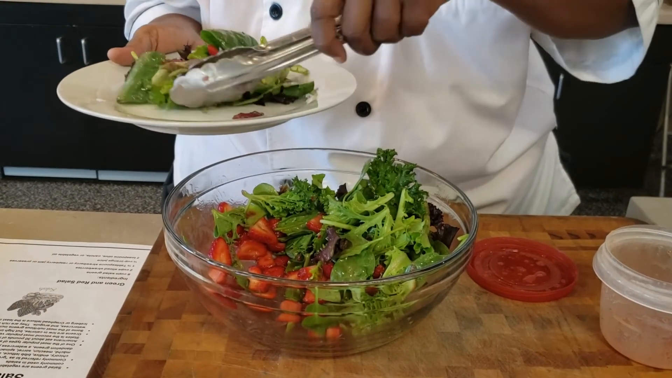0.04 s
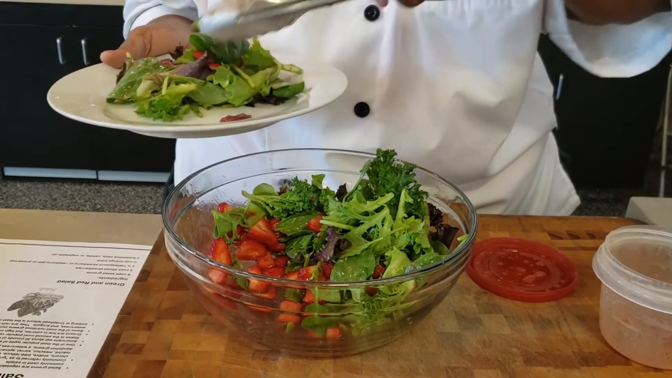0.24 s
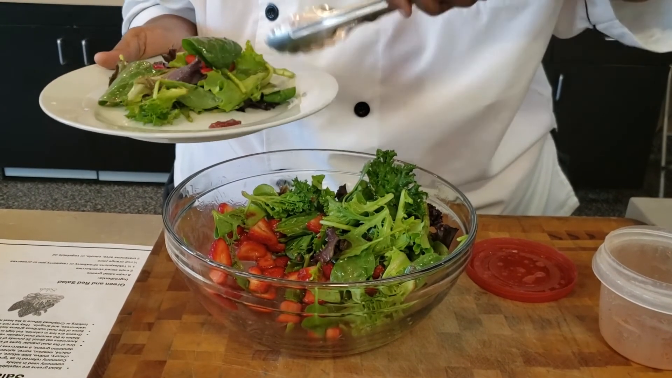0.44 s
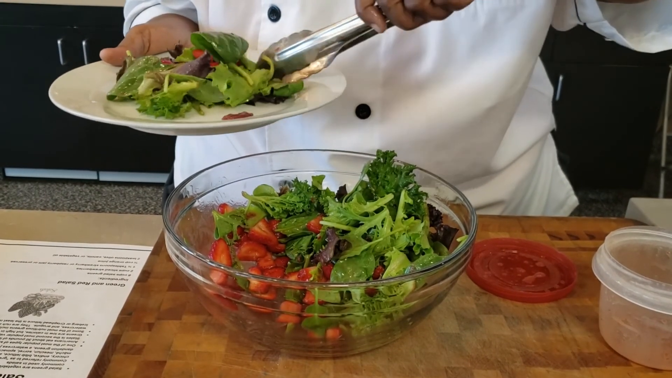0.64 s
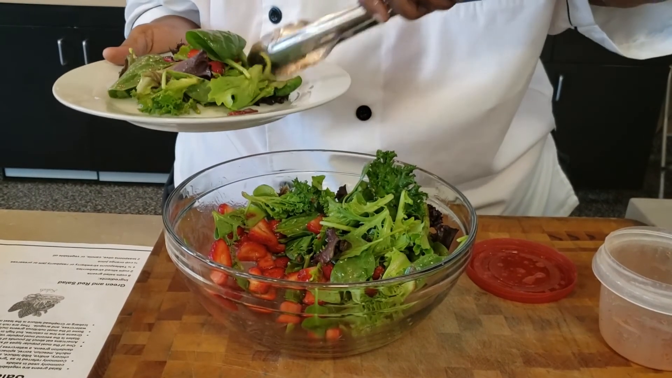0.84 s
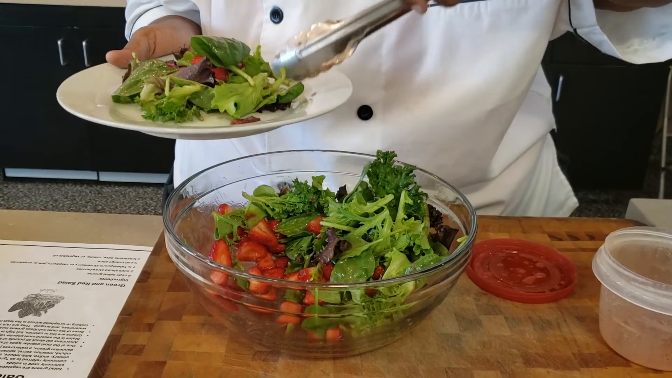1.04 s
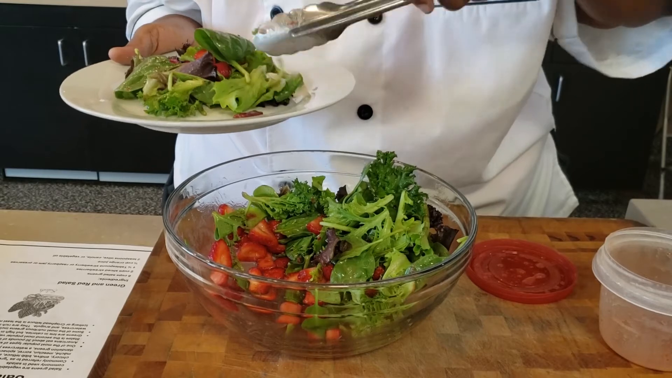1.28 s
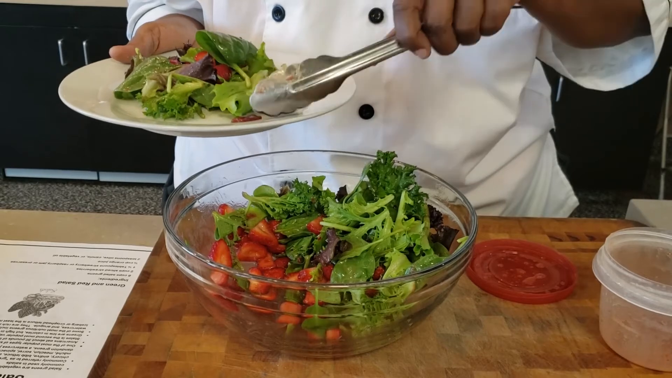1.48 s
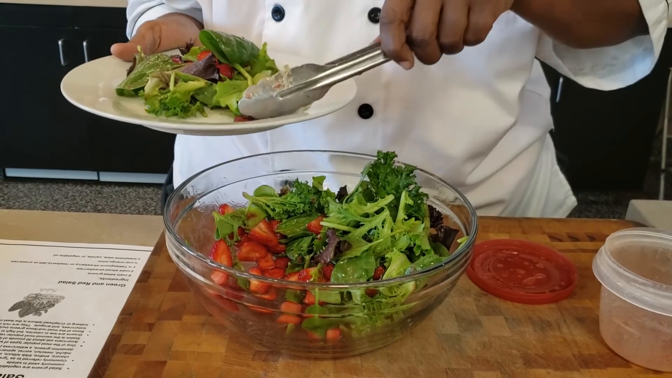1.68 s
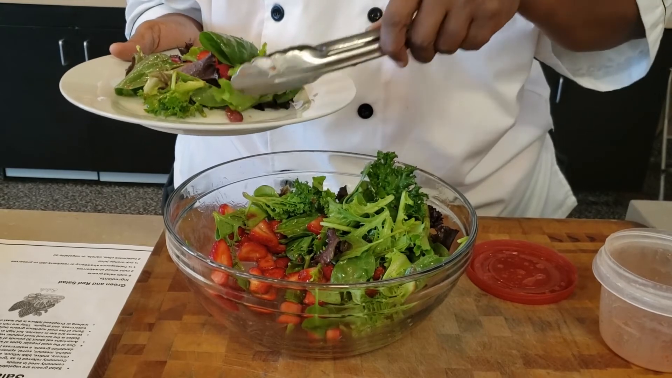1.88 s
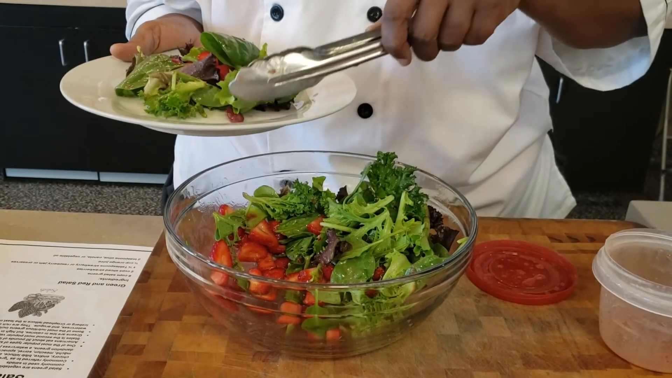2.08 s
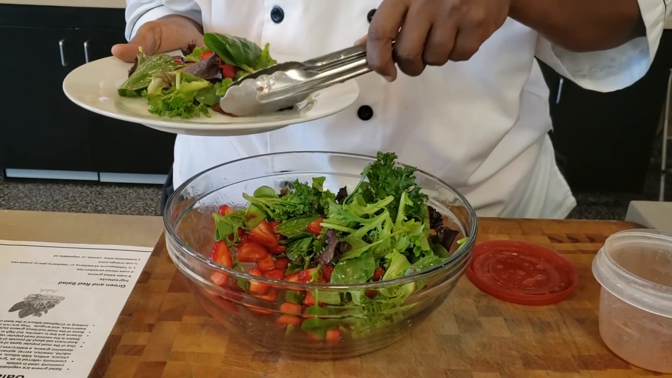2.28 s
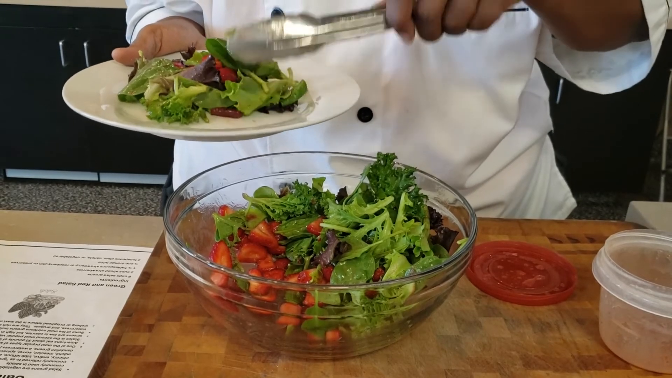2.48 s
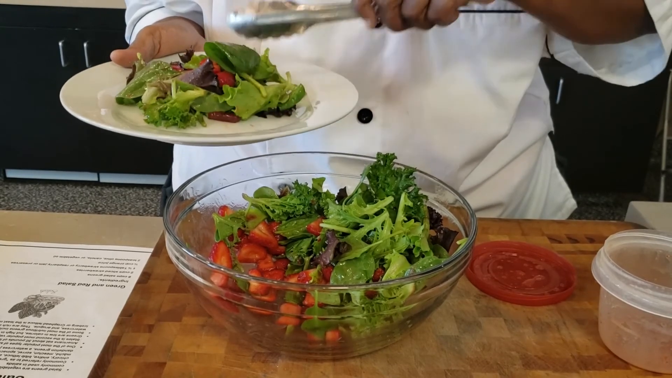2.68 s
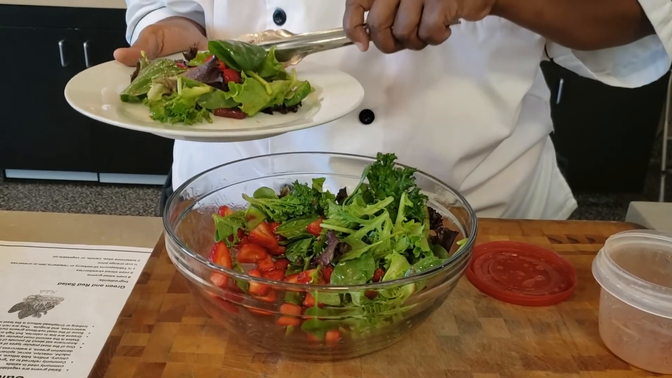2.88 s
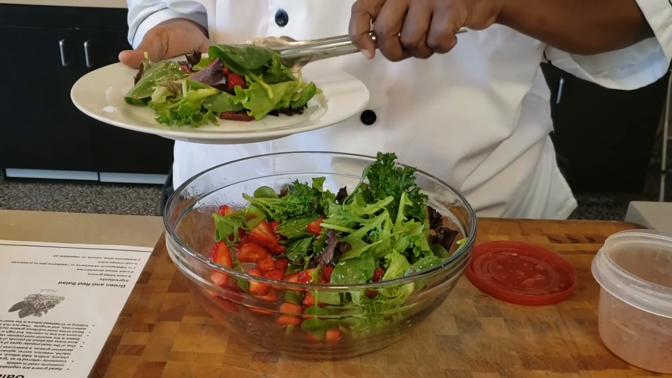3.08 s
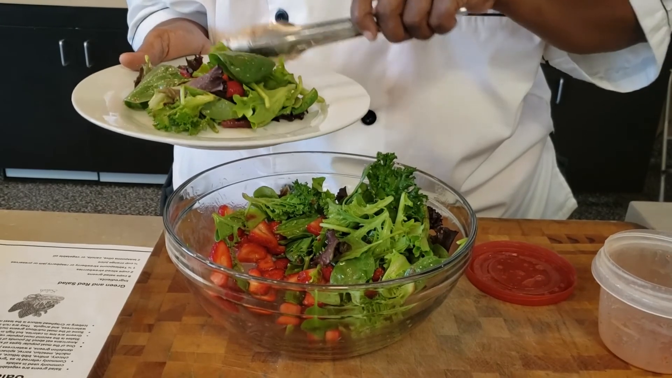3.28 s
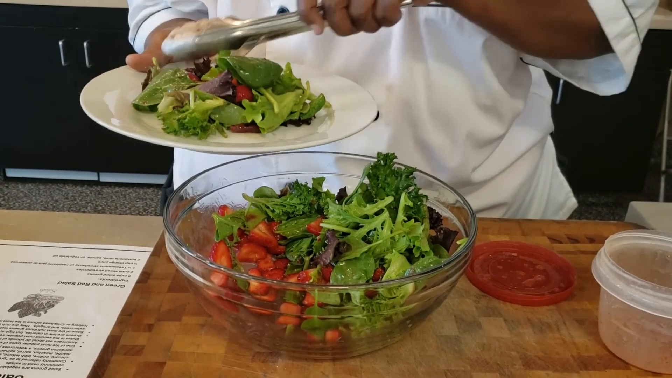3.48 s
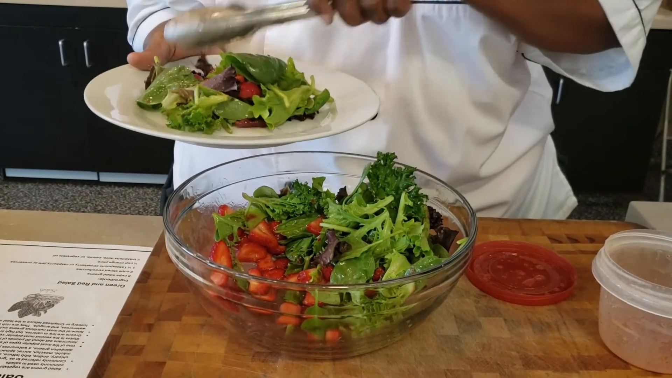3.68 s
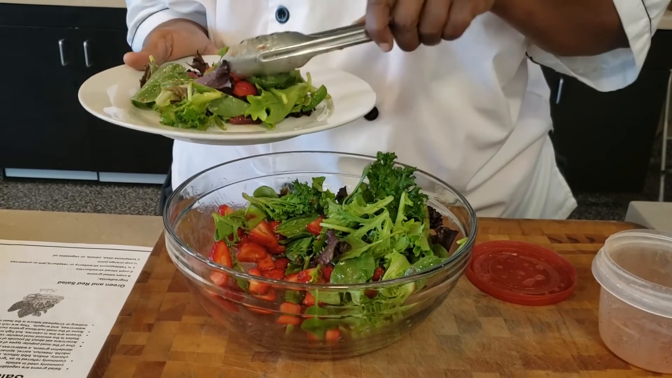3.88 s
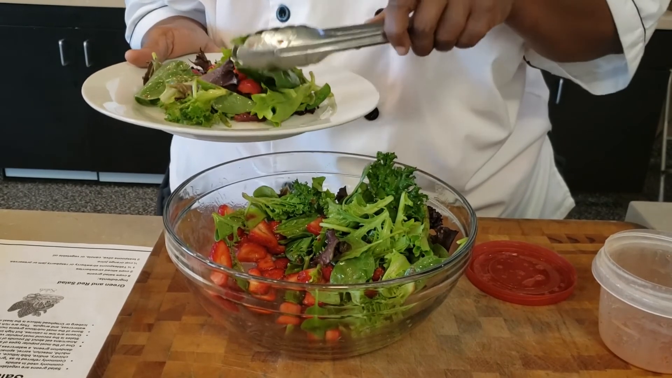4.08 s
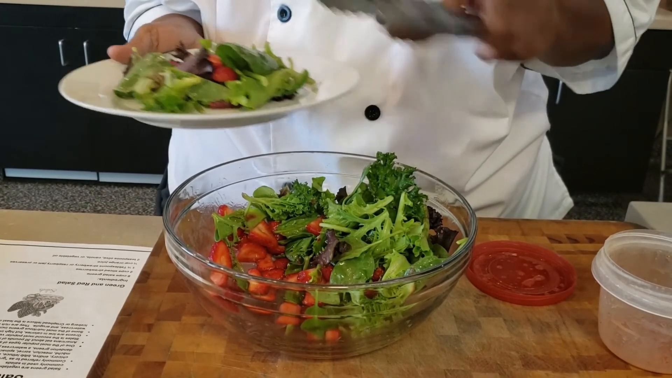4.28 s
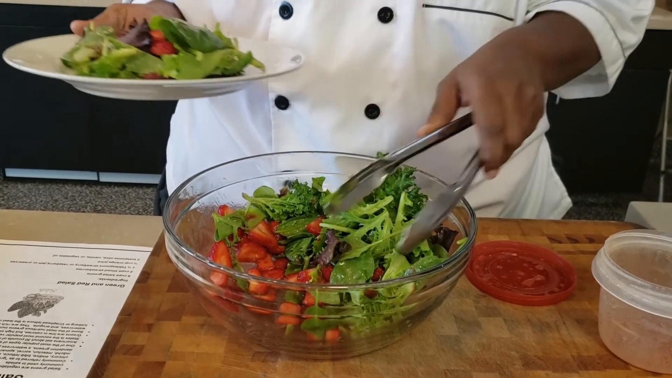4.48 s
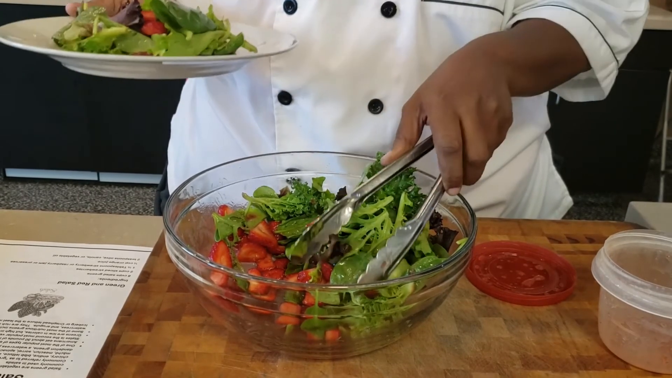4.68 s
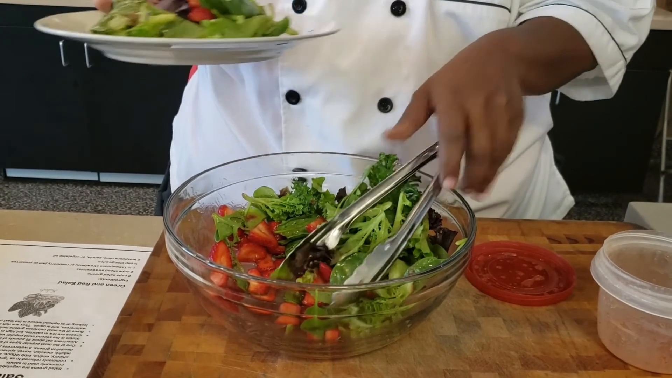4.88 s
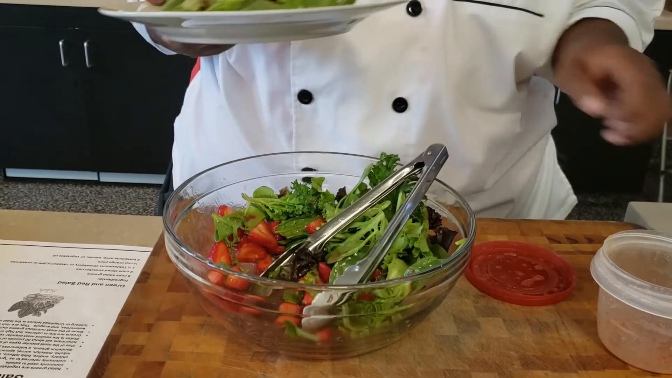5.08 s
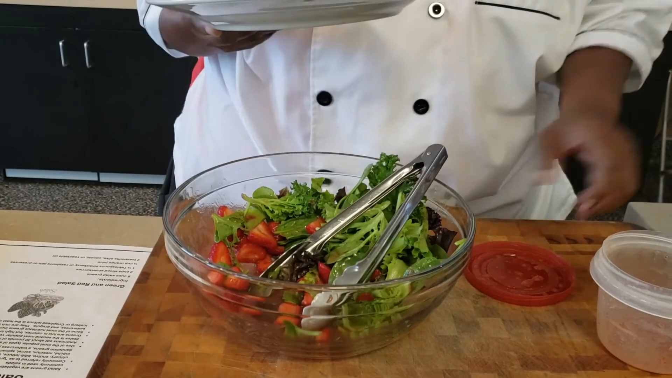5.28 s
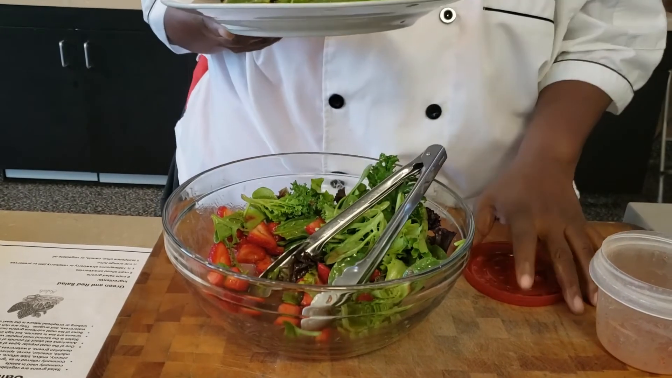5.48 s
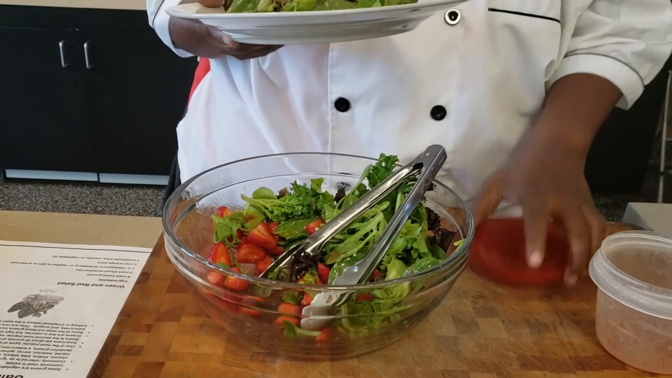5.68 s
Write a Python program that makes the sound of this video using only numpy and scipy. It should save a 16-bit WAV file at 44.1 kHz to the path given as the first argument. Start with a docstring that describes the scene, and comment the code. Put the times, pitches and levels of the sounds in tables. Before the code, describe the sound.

Sparse metallic tong clinks over low ventilation rumble, then a loud, bright clatter of steel on glass, settling before soft plastic taps.

```python
"""A quiet kitchen carries a low rumble, a steady machine hum and faint hiss: filtered noise and one sine.
Salad leaves rustle faintly as crowds of tiny clicks; steel tongs clink by the plate, then snap shut.
The tongs graze a glass bowl and drop in, where they ring, rattle, skid and settle; the leaves shift again.
Last, a hand taps a plastic lid on the board. Each blow sums decaying modes and a noisy crack.
Room echoes surround the handling sounds, and a gain control ducks the loud blows."""
import sys
import numpy as np
from scipy import signal
from scipy.fft import rfft, irfft, next_fast_len
from scipy.io import wavfile
from scipy.ndimage import uniform_filter1d

SR = 44100
rng = np.random.default_rng(int(sys.argv[2]) if len(sys.argv) > 2 else 0)


def dump(signal):
    """Clip the signal to [-1, 1] and save it as 16-bit WAV at the path in sys.argv[1]."""
    limited = np.clip(np.atleast_2d(signal).T, -1, 1)
    pcm = np.round(limited * 32767).astype(np.int16)
    wavfile.write(sys.argv[1], SR, pcm)


N = 253045
TIME = np.arange(N) / SR
RING_TIME = TIME[:SR // 4]


def from_db(db):
    """Logarithmic level: decibels become an amplitude gain."""
    return 10 ** (np.asarray(db) / 20)


def rms_one(x):
    """Normalisation of power: scale to rms 1."""
    return x / np.sqrt(np.mean(x ** 2) + 1e-20)


def attack_one(x):
    """Normalisation of the onset: the first hundredth of a second gets rms 1."""
    return x / np.sqrt(np.mean(x[:, :SR // 100] ** 2))


def decay(t, t60):
    """Exponential damping: the amplitude falls 60 dB in t60 seconds."""
    return np.exp(-np.log(1000) * t / t60)


def at_hz(points, hz):
    """Interpolation of a table along a logarithmic frequency axis."""
    known_hz, values = np.transpose(points)
    return np.interp(np.log(np.maximum(hz, 1)), np.log(known_hz), values)


def colour(x, spectrum):
    """Minimum-phase filtering to a (Hz, dB) shape: causality lets nothing sound early."""
    size = 2 * next_fast_len(x.shape[-1] // 2 + 2048)
    log_gain = np.log(from_db(at_hz(spectrum, np.fft.rfftfreq(size, 1 / SR))))
    cepstrum = irfft(log_gain)
    # Folding the cepstrum onto positive times gives minimum phase.
    cepstrum[1:size // 2] *= 2
    cepstrum[size // 2 + 1:] = 0
    response = np.exp(rfft(cepstrum))
    return irfft(rfft(x, size) * response)[..., :x.shape[-1]]


def add(track, s, sound):
    """Superposition: mix a stereo sound in at a time in seconds."""
    start = round(s * SR)
    track[:, start:start + sound.shape[1]] += sound[:, :N - start]


# Likeness of the two channels of the room noise. Each row: frequency in Hz, left-right correlation.
LIKENESS = [(30, 0.93), (60, 1), (125, 0.97), (250, 0.86), (500, 0.56), (1500, 0.053), (8000, 0.6)]


def steady_noise(spectrum):
    """Diffuse field: left-right correlation varies with frequency, highest in the bass."""
    mid, side = rfft(rng.standard_normal((2, next_fast_len(N, True))))
    alike = np.clip(at_hz(LIKENESS, np.linspace(0, SR / 2, len(mid))), 0, 1)
    mid = np.sqrt(1 + alike) * mid
    side = np.sqrt(1 - alike) * side
    pair = irfft(mid + side * [[1], [-1]])[:, :N]
    return rms_one(colour(pair, spectrum))


# Spectra of the ventilation rumble and the hiss. Each row: frequency in Hz, relative density in dB per Hz.
RUMBLE = [(22, -30.5), (38, -5.5), (59, -1.5), (81, -2.5), (113, -0.5), (242, -12.5), (264, -14),
          (319, -16), (355, -13), (400, -20), (520, -50.5), (880, -120)]
AIR = [(240, -34), (400, -3.5), (1040, -19), (1250, -19.5), (1490, -23.5), (2120, -26), (2750, -29.5),
       (3420, -30.5), (4050, -35), (7510, -29), (9320, -38.5), (11200, -35), (16000, -42)]
RUMBLE_DB, AIR_DB, HUM_DB = -45.5, -59, -49   # rms levels
HUM_HZ = 58.86


def background():
    """Stationary sources: ventilation rumble and hiss are shaped noise, a motor's hum is a pure tone."""
    rumble = from_db(RUMBLE_DB) * steady_noise(RUMBLE)
    hiss = from_db(AIR_DB) * steady_noise(AIR)
    hum = from_db(HUM_DB) * np.sqrt(2) * np.sin(2 * np.pi * HUM_HZ * TIME)
    return rumble + hiss + hum


def grains(per_s, uneven_db):
    """Random impulse process: sparse clicks of uneven size and either sign."""
    size_db = uneven_db * (2 * rng.random(N) - 1)
    clicks = rng.random(N) < per_s / SR
    return clicks * rng.choice([-1, 1], N) * from_db(size_db)


def strokes(events, attack_s, release_db_per_s):
    """Contact pressure as envelope: each stroke builds up to its start, holds, then dies away."""
    total = np.zeros(N)
    for s, length_s, db in events:
        rise = np.clip(1 + (TIME - s) / attack_s, 0, 1)
        fall_db = release_db_per_s * np.maximum(TIME - s - length_s, 0)
        total += from_db(db - fall_db) * rise
    return total


# Leaves shift under the tongs, then settle. Each row: start of full pressure in seconds,
# length in seconds, level in dB.
RUSTLES = [(.035, 0.016, -56), (4.77, .05, -67), (5.3, 0.36, -63)]
RUSTLE_ATTACK_S, RUSTLE_RELEASE_DB_PER_S = 0.083, 77


def leaves():
    """Crackling noise: a dense crowd of tiny crisp impulses makes the rustle of salad leaves."""
    crackle = np.array([grains(per_s=1300, uneven_db=12) for side in range(2)])
    crisp = colour(crackle, [(300, 0), (1700, 1.5), (4000, -1.5), (8000, -5.5), (15000, -7.5)])
    return rms_one(crisp) * strokes(RUSTLES, RUSTLE_ATTACK_S, RUSTLE_RELEASE_DB_PER_S)


# Phase between the microphones at full spread. Each row: frequency in Hz, phase in radians.
MIC_PHASE = [(500, .3), (1700, .5), (2600, 1.0), (3700, 2.3), (6000, 2.3), (8000, .7), (14000, .4)]
FOCUS_DB, FOCUS_OCTAVES = 7.5, 0.12   # lift of the modes a point of contact favours, and its width


def ringing(modes, focus_hz, spread, split=0.007):
    """Modal synthesis: modes in close pairs beat; the point of contact favours those near one pitch."""
    hz, db, t60 = np.transpose(modes)[:, :, None]
    favour_db = FOCUS_DB * np.exp(-(np.log2(hz / focus_hz) / FOCUS_OCTAVES) ** 2)
    height = from_db(db + favour_db) * decay(RING_TIME, t60)
    phase = rng.uniform(0, 2 * np.pi, hz.shape)
    turn = 2 * np.pi * hz * RING_TIME
    twin = turn * (1 + split * rng.choice([-1, 1], hz.shape))
    # The side is in quadrature with the mid, so mixing them shifts the phase of each channel.
    mid = height * (np.sin(turn + phase) + .5 * np.sin(twin + phase))
    side = height * (np.cos(turn + phase) + .5 * np.cos(twin + phase))
    apart = spread * at_hz(MIC_PHASE, hz) / 2
    common = (mid * np.cos(apart)).sum(0)
    opposed = (side * np.sin(apart)).sum(0)
    return attack_one(common + opposed * [[-1], [1]])


def crack(spectrum, t60, width):
    """High modal density: the weak, short modes of a contact merge into decaying noise."""
    mid, side = rng.standard_normal((2, len(RING_TIME)))
    burst = (mid + width * side * [[1], [-1]]) * decay(RING_TIME, t60)
    return attack_one(colour(burst, spectrum))


CONTACT_S = .001   # time constant of the onset


def blows(events, modes, crack_spectrum, crack_t60, spread, width):
    """Impact excitation: each blow is ring plus crack, with its own brightness."""
    out = np.zeros((2, N))
    for s, db, bright_db, crack_db, pan_db, focus_hz in events:
        ring = ringing(modes, focus_hz, spread)
        blow = ring + from_db(crack_db) * crack(crack_spectrum, crack_t60, width)
        blow = blow * (1 - np.exp(-RING_TIME / CONTACT_S))
        blow = colour(blow, [(500, 0), (16000, 5 * bright_db)])   # a tilt over five octaves
        side_gains = from_db([[db + pan_db / 2], [db - pan_db / 2]])
        add(out, s, attack_one(blow) * side_gains)
    return out


# Clinks of the open tongs. Each row: start in seconds, level in dB, brightness in dB per octave,
# crack against ring in dB, left against right in dB, pitch favoured by the point of contact in Hz.
CLINKS = [(.5528, -23, .5, 1, 1.5, 1464), (.7115, -33.5, 0.5, 0, 2.5, 2740),
          (1.5022, -38.5, 4.5, -13, 2.5, 4730), (1.5212, -21.5, 0.5, -4, 2, 1830),
          (1.687, -37.5, -1, -5, 3, 1720), (1.7512, -35, -1.5, 5, 1.5, 4160), (4.2625, -55, 8, -4, 4, 4700)]
# Modes of the open tongs. Each row: frequency in Hz, relative level in dB, t60 in seconds.
TONGS = [(608, -15.6, 0.066), (1384, -13.3, 0.123), (1718, -8.6, 0.126), (2072, -10.8, 0.121),
         (2130, -9.0, 0.12), (2235, -14.4, 0.118), (2760, -7.6, 0.112), (2998, -2.8, 0.11),
         (3912, -8.1, 0.103), (3989, -5.6, 0.102), (4563, -11.8, 0.099), (4760, -5.0, 0.098),
         (5037, 0.0, 0.097), (5640, -6.6, 0.094), (5945, -10.7, 0.093), (6225, -9.4, 0.092),
         (6410, -11.2, 0.091), (6524, -12.4, 0.091), (6659, -9.6, 0.09), (7000, -15.3, 0.089),
         (7345, -15.7, 0.088), (7498, -12.6, 0.087), (7971, -15.1, 0.086), (8467, -16.1, 0.085),
         (8977, -12.2, 0.084), (11002, -17.5, 0.079), (12376, -18.0, 0.077), (12662, -22.3, 0.077),
         (13801, -21.0, 0.075), (14085, -18.6, 0.075)]
# Crack of steel. Each row: frequency in Hz, relative density in dB per Hz.
STEEL_CRACK = [(150, -93), (400, -12), (620, -4.5), (950, -9.5), (1400, -5.5), (2200, -3.5), (3400, -3.5),
               (6000, -3), (9000, -9), (15000, -12)]
# Decay of the crack by struck object: t60 in seconds.
CRACK_T60 = {"tongs": .055, "jaws": .03, "bowl": .045, "lid": .03}


def tongs_clink():
    """Free vibration: the open steel arms ring in many lightly damped modes."""
    return blows(CLINKS, TONGS, STEEL_CRACK, CRACK_T60["tongs"], spread=0.73, width=0.49)


# The jaws snap shut. Each row: start in seconds, level in dB, brightness in dB per octave,
# crack against ring in dB, left against right in dB, favoured pitch in Hz.
SNAPS = [(2.8146, -24, 0.4, -2, 2.5, 4030)]
# Modes of the shut jaws. Each row: frequency in Hz, relative level in dB, t60 in seconds.
SHUT_JAWS = [(666, -4.6, 0.026), (1255, -4.5, 0.042), (1352, -4.4, 0.044), (1718, -6.2, 0.046),
             (1827, -3.9, 0.045), (1909, -5.5, 0.045), (2133, -10.2, 0.044), (3114, -7.4, 0.04),
             (4166, -8.4, 0.037), (4484, -3.5, 0.036), (4561, 0.0, 0.036), (4796, 0.0, 0.036),
             (5021, -12.7, 0.035), (5758, -7.0, 0.034), (6367, -10.5, 0.033), (6477, -5.0, 0.033),
             (6687, -5.3, 0.033), (6797, -5.1, 0.033), (7975, -3.4, 0.031), (9972, -10.7, 0.03),
             (11679, -5.7, 0.028), (11879, -10.2, 0.028), (12082, -6.4, 0.028), (12421, -1.8, 0.028),
             (12728, -10.0, 0.028), (13993, -9.2, 0.027)]


def jaws_snap():
    """Contact damping: the shut jaws have shorter modes than the open arms."""
    return blows(SNAPS, SHUT_JAWS, STEEL_CRACK, CRACK_T60["jaws"], spread=0.52, width=0.33)


# The tongs slide on the glass: a graze going in, the skid after the drop, a last slip.
# Each row: start of full pressure in seconds, length in seconds, contact level in dB.
SLIDES = [(4.615, 0.21, -70.5), (4.89, 0.12, -36.5), (5.06, 0.069, -60)]
SLIDE_ATTACK_S, SLIDE_RELEASE_DB_PER_S = 0.019, 700
# Modes of the glass bowl. Each row: frequency in Hz, relative level in dB, t60 in seconds.
BOWL = [(468, -14.3, 0.084), (514, -16.4, 0.091), (608, -12.9, 0.103), (658, -19.5, 0.109),
        (971, -10.3, 0.146), (1071, -16.8, 0.157), (1709, 0.0, 0.196), (1841, -13.6, 0.192),
        (1919, -19.0, 0.19), (2016, -12.5, 0.188), (2344, -21.3, 0.181), (2635, -3.8, 0.176),
        (2729, -19.9, 0.174), (3691, -4.1, 0.161), (3888, -23.2, 0.159), (4198, -23.0, 0.156),
        (4744, -6.1, 0.152), (4830, -5.6, 0.151), (4951, -19.0, 0.15), (5566, -12.4, 0.146),
        (6069, -4.8, 0.143), (6173, -21.1, 0.142), (6691, -18.0, 0.139), (6901, -15.0, 0.138),
        (7165, -20.4, 0.137), (7477, -15.1, 0.135), (8926, -19.4, 0.129), (9749, -29.8, 0.127),
        (10532, -24.1, 0.124), (12261, -25.4, 0.12)]
# Crack of glass. Each row: frequency in Hz, relative density in dB per Hz.
GLASS_CRACK = [(150, -15.5), (300, -2.5), (480, 3.5), (750, -1.5), (1100, 0), (2000, 0), (3200, -6),
               (6500, -7), (9000, -12.5), (15000, -19.5)]


def skid(per_s=180, crack_db=0.0):
    """Stick-slip friction: steel on glass makes a run of small contacts that excite the bowl's modes."""
    slips = grains(per_s, uneven_db=4)
    pressure = strokes(SLIDES, SLIDE_ATTACK_S, SLIDE_RELEASE_DB_PER_S)
    ring = ringing(BOWL, focus_hz=3780, spread=0.93)
    touch = ring + from_db(crack_db) * crack(GLASS_CRACK, t60=0.022, width=0.62)
    return signal.fftconvolve([slips * pressure], touch, axes=1)[:, :N]


# Steel meets the glass bowl. Each row: start in seconds, level in dB, brightness in dB per octave,
# crack against ring in dB, left against right in dB, favoured pitch in Hz.
KNOCKS = [(4.7812, -31.5, -3.5, -10, 0, 2620), (4.844, -32.5, -1.5, -16, 1, 2800),
          (4.859, -10.5, -0.24, -8, 1, 2120), (4.8815, -17.5, 2, -12, -3, 6450),
          (4.922, -22.5, 4, -31, 8, 2635), (4.976, -22, -0.5, -7.5, 4, 1850),
          (5.009, -25, 2.5, 5.5, 2.5, 5600), (5.028, -36, -5, 17, 6, 2600),
          (5.124, -37.5, -1.5, 14, 0, 1710)]


def bowl_knocks():
    """Shell vibration: each knock of the steel sets off the modes of the glass."""
    return blows(KNOCKS, BOWL, GLASS_CRACK, CRACK_T60["bowl"], spread=1.0, width=0.51)


# Fingers on the plastic lid. Each row: start in seconds, level in dB, brightness in dB per octave,
# crack against ring in dB, left against right in dB, favoured pitch in Hz.
TAPS = [(5.528, -49, -5.5, 4, 1, 1550), (5.609, -61, -13.5, 18, -4, 3140),
        (5.654, -43.5, 2, -10.5, 3.5, 1810)]
# Modes of the lid. Each row: frequency in Hz, relative level in dB, t60 in seconds.
LID = [(1200, -7.5, 0.016), (1490, -0.5, 0.013), (1837, -6.5, 0.022), (3100, -8, 0.0081)]
# Crack of the lid. Each row: frequency in Hz, relative density in dB per Hz.
LID_CRACK = [(200, -13.5), (800, 1.5), (1700, -1.5), (3000, -2), (7000, -7.5), (10000, -27), (15000, -24)]


def lid_taps():
    """Strong damping: plastic has few modes, and they die within hundredths of a second."""
    return blows(TAPS, LID, LID_CRACK, CRACK_T60["lid"], spread=1.0, width=0.78)


def evened(response):
    """Spectral flattening: level out the broad peaks and dips of a one-second room response."""
    power = uniform_filter1d(np.abs(rfft(response)) ** 2, size=25)   # bins are 1 Hz apart
    correction_db = -10 * np.log10(power + 1e-6)
    return colour(response, np.c_[np.arange(len(power)), correction_db][1:])


# Reverberation time of the late tail. Each row: frequency in Hz, t60 in seconds.
ROOM_T60 = [(150, 0.35), (500, 0.87), (1500, 0.75), (4500, 0.95), (8000, 0.69), (15000, 0.52)]
# Echoes against direct sound, before evening. Each row: frequency in Hz, level in dB.
ROOM_DB = [(150, -4.5), (500, 0.5), (1500, 0.5), (4500, 1), (8000, -1.5), (15000, -1)]
# Stereo width of the echoes. Each row: frequency in Hz, ratio of side to mid.
ROOM_WIDTH = [(150, .2), (600, 0.14), (1700, 1), (4000, 0.81), (12000, 0.12)]


def kitchen(x, early_db=11.0, early_t60=0.12, first_echo_s=0.0029):
    """Reverberation: direct sound, dense early echoes that die fast, a late tail with t60 set by band."""
    t = TIME[:SR]
    mid, side = rfft(rng.standard_normal((2, SR)))
    bins_hz = np.arange(len(mid))
    width = at_hz(ROOM_WIDTH, bins_hz)
    white = (mid + width * side * [[1], [-1]]) / np.hypot(1, width)
    centres = np.geomspace(125, 16000, 8)
    response = signal.unit_impulse(SR)
    for hz, share in zip(centres, np.eye(len(centres))):
        band = irfft(white * at_hz(np.c_[centres, share], bins_hz), SR)
        late = decay(t, at_hz(ROOM_T60, hz))
        early = from_db(early_db) * decay(t, early_t60)
        fade = (late + early) * (t > first_echo_s)
        response = response + from_db(at_hz(ROOM_DB, hz)) * band * fade / np.linalg.norm(fade)
    return signal.fftconvolve(x, [evened(channel) for channel in response], axes=1)[:, :N]


def scene():
    """Superposition: the handling sounds reverberate in the kitchen, over its background."""
    noise = background()
    handling = leaves() + tongs_clink() + jaws_snap() + skid() + bowl_knocks() + lid_taps()
    return kitchen(handling) + noise


CUTOFF_HZ = 16000


def record(dry, threshold_db=-25.5, slope=0.2, release_db_per_s=0.5):
    """Automatic gain control ducks after a loud blow and recovers slowly; a low-pass cuts the top."""
    power = uniform_filter1d(np.mean(dry ** 2, axis=0), size=256)
    level_db = 10 * np.log10(np.maximum(power, 1e-12))
    over_db = slope * np.maximum(level_db - threshold_db, 0)
    # A running peak that sinks at the release rate.
    recovery_db = release_db_per_s * TIME
    held_db = np.maximum.accumulate(over_db + recovery_db) - recovery_db
    pole = np.exp(-1 / (0.02 * SR))   # 20 ms smoothing
    duck_db = signal.lfilter([1 - pole], [1, -pole], held_db)
    low_pass = signal.ellip(10, .1, 80, CUTOFF_HZ, fs=SR, output="sos")
    return signal.sosfilt(low_pass, dry * from_db(-duck_db))


dry = scene()
out = record(dry)
dump(out)
```